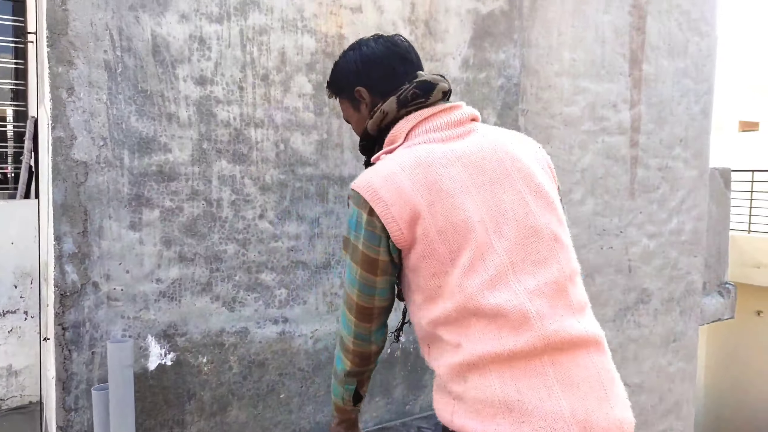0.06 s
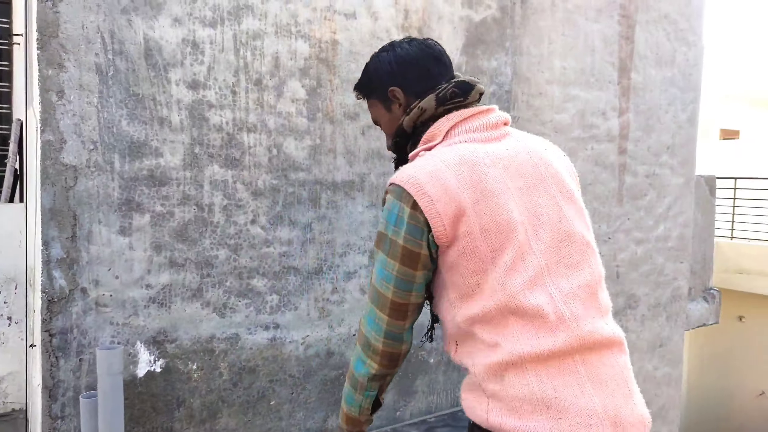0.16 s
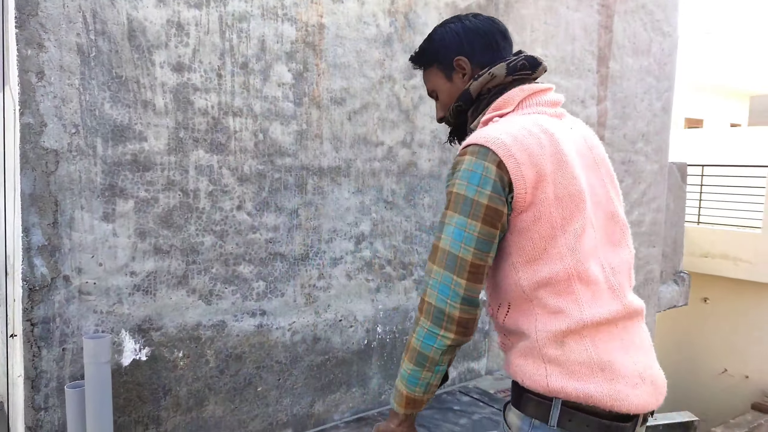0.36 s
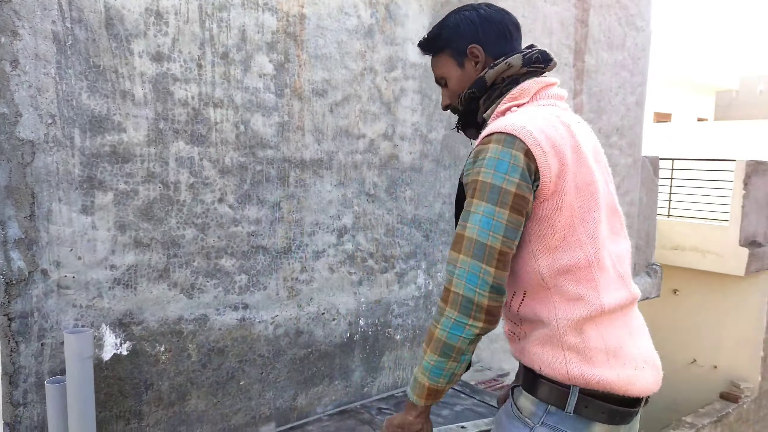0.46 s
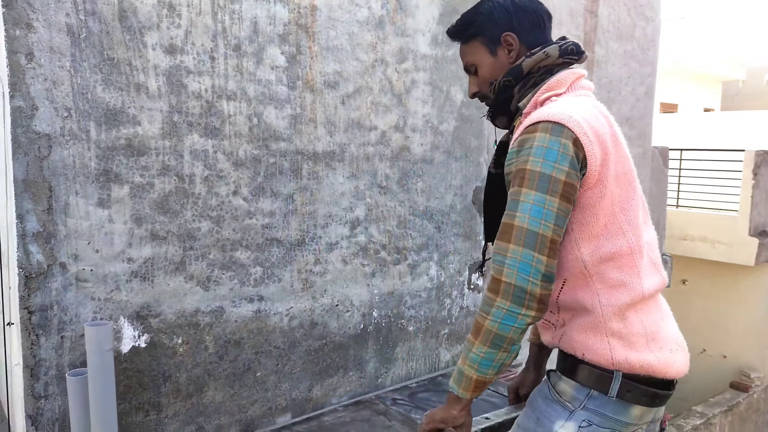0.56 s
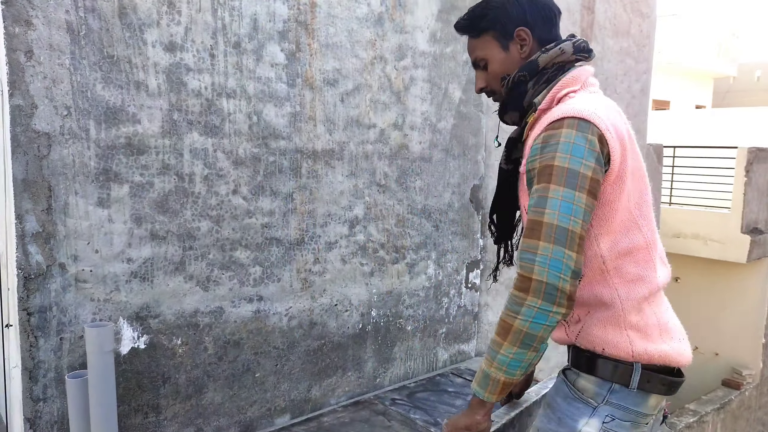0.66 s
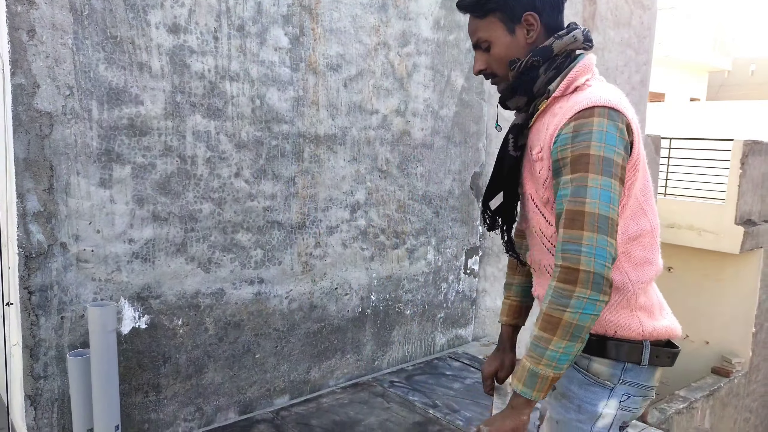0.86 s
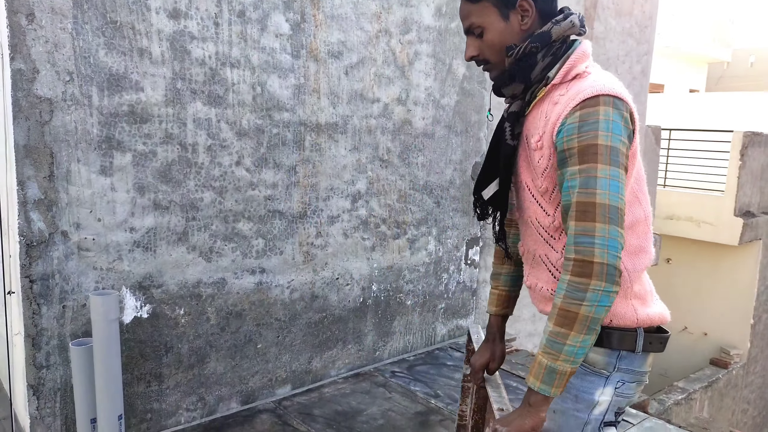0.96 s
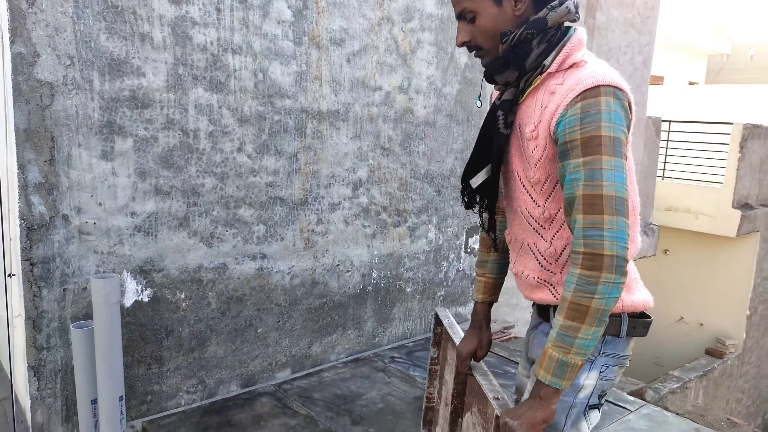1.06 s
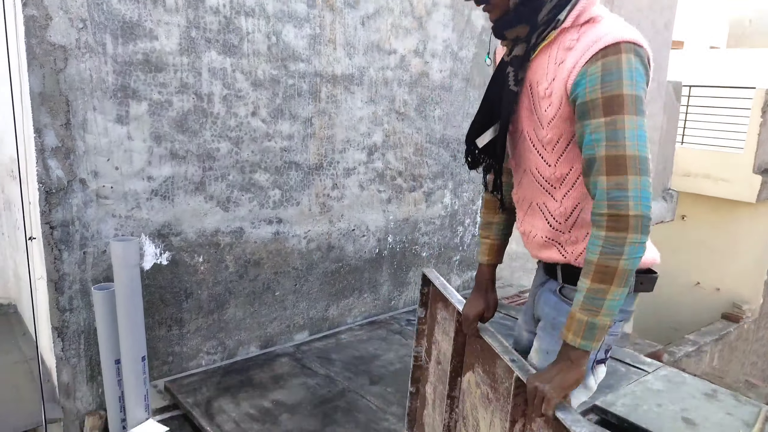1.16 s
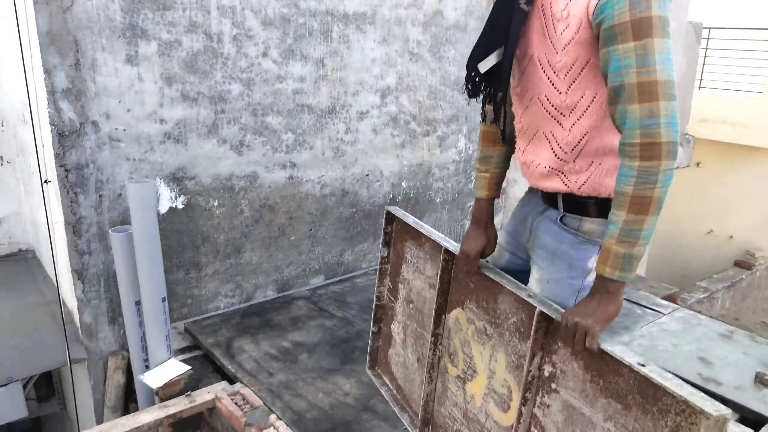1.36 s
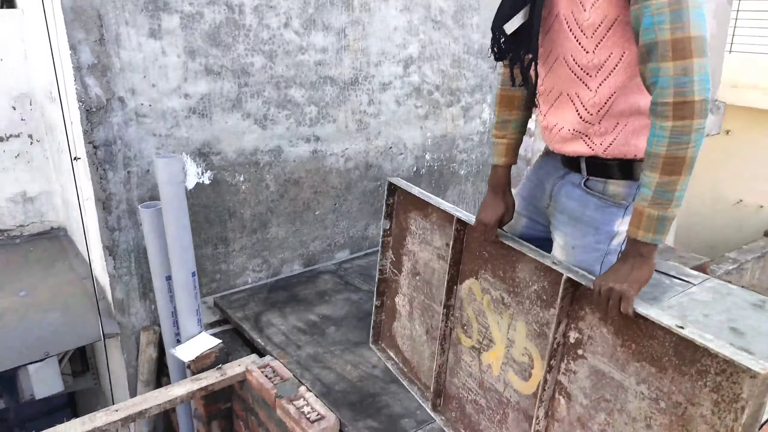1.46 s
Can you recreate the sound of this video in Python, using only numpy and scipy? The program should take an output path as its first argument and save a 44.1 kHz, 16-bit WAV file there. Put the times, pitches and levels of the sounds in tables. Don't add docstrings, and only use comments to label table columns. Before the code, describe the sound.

A framed steel plate is handled on bricks outdoors. Soft grit scrapes begin, brighter near 0.2 s, with small knocks and a sharp crack at 0.23. The loudest clanks cluster at 0.32-0.47 with hollow thuds and crackle; a thin squeal follows to 0.8. Knocks at 0.55-0.7 weaken. After a lull, faint scrapes lead to a softer knock at 1.2 and fading rattle. Wind and faint distant site noise continue.

```python
import sys
import numpy as np
from scipy import signal
from scipy.fft import rfft, irfft
from scipy.io import wavfile
from scipy.ndimage import uniform_filter1d

SR = 44100
rng = np.random.default_rng(int(sys.argv[2]) if len(sys.argv) > 2 else 0)


def to_wav(sig):
    pcm = np.clip(np.atleast_2d(sig), -1, 1) * 32767
    pcm = np.round(pcm).astype(np.int16)
    wavfile.write(sys.argv[1], SR, pcm.T)


def voltage_ratio(level):
    return 10 ** (np.asarray(level, float) / 20)


N = 66150
SPAN = 2 ** 14

# frequency in Hz, level in dB.
SITE_SPECTRUM = [(30, -7.5), (100, 0.5), (200, -9.5), (700, -13.5), (1500, -25.5), (3000, -37.5),
                 (6000, -43), (15500, -50.5)]
# time in seconds, level in dB.
GUSTS = [(0.0, -61.5), (0.028, -47.5), (0.174, -61), (0.358, -45.5), (0.38, -57), (0.54, -60), (0.622, -52),
         (0.665, -64), (0.725, -66), (0.78, -47), (0.85, -62), (0.93, -66.5), (1.22, -68.5), (1.26, -64),
         (1.3, -48.5), (1.332, -46), (1.44, -62), (1.49, -56)]
# start in seconds, frequency in Hz, level in dB,
# time to fall by 60 dB in seconds.
GROUND_THUDS = [(.332, 68, -34, .3), (.402, 110, -35, .2), (.56, 82, -48, .3), (.61, 75, -44, .2),
                (.743, 80, -38, .15), (.76, 45, -40, .25), (.745, 120, -43, .6), (.755, 155, -48, .4),
                (1.245, 190, -50, .15), (.62, 145, -48, .15), (.335, 135, -42, .2), (.42, 180, -44, .15),
                (1.305, 100, -49, .2)]
# time in seconds, pitch in Hz, level in dB.
SQUEAL_PATH = [
    (.42, 3280, -80),
    (.44, 3290, -64),
    (.505, 3330, -66),
    (.525, 3410, -62),
    (.62, 3450, -63),
    (.75, 3470, -68),
    (.81, 3480, -78),
    (.88, 3480, -95),
]
# time in seconds, level in dB.
CRACKLE_LEVEL = [
    (.02, -99),
    (.08, -85),
    (.16, -81.5),
    (.3, -77),
    (.38, -73),
    (.5, -78.5),
    (.53, -72),
    (.6, -90),
    (.66, -103.5),
]
# centre in Hz, width in Hz, level in dB.
SNAP_BANDS = [(5040, 1000, -0.5), (6550, 460, -2.5)]
# start in seconds, length in seconds, level in dB,
# tilt in dB per octave, singing frequency in Hz.
STROKES = [(0, 0.11, -60, -8.5, 970), (.035, 0.1, -60, -3, 1610), (0.108, 0.15, -59, -4.5, 1640),
           (0.178, 0.093, -44, -0.5, 2550), (0.251, .08, -76.5, 12.5, 6500),
           (0.959, 0.047, -73.5, 0.5, 3460), (.965, 0.037, -75.5, 0, 2360), (1.051, .14, -65, -0.5, 3700),
           (1.081, .09, -71.5, 7, 8500), (1.19, .085, -58, -7, 3500), (.31, .13, -50, -11, 2800),
           (.23, .07, -58, 0, 2400), (1.313, .12, -60.5, -12.5, 1270)]
# frequency in Hz, level in dB.
GRIT_SPECTRUM = [(500, 4), (1250, 4.5), (2600, -1.5), (4000, -9), (5500, -13.5), (7300, -22.5), (8500, -28),
                 (14000, -51.5)]
# start in seconds, peak level in dB, frequency in Hz.
DRY_TICKS = [(.2304, -22, 1450), (.2328, -27, 1050), (.110, -45, 1700), (.3025, -41, 1400),
             (1.4762, -54, 1800), (.072, -46, 1600), (.181, -48, 1600), (.313, -42, 1400),
             (.684, -70, 6500), (1.294, -60, 2300), (.2306, -48, 4200), (.551, -31, 900),
             (.5525, -42, 1400), (.3234, -30, 1500), (.1885, -33, 1500), (.2115, -33, 1500),
             (.284, -62, 5500), (.304, -62, 6000), (.522, -60, 6000), (.93, -72, 6000), (.478, -38, 1100)]
# start in seconds, driven time in seconds,
# frequency in Hz, level in dB, time to fall by 60 dB in seconds.
HELD_MODES = [(.1885, .013, 660, -36.5, .05), (.188, .006, 1600, -46, .04), (.237, .05, 955, -53, .15),
              (.33, .032, 250, -31, .1), (.333, .03, 505, -32, 0.089), (.338, .03, 558, -32, .2),
              (.34, .018, 877, -33, .1), (.355, .025, 708, -33, 0.13), (.326, .03, 1040, -40.5, 0.18),
              (.326, .025, 1200, -38.5, .1), (.335, .04, 1468, -40.5, 0.37), (.335, .03, 1666, -40, .3),
              (.33, .025, 1906, -40, 0.12), (.33, 0.025, 2400, -50, .3), (.345, 0.034, 1349, -43.5, 0.33),
              (.36, 0.026, 338, -38.5, 0.13), (.415, .042, 704, -34, .08), (.39, .025, 445, -35, .1),
              (.42, 0.046, 1210, -43, 0.25), (.41, .05, 1272, -44.5, 0.39), (.43, .03, 256, -41, .08),
              (.44, 0.016, 484, -40, 0.092), (.551, .05, 350, -39.5, 0.064), (.56, 0.018, 460, -40, .15),
              (.553, 0.042, 1175, -43, 0.22), (.57, .02, 780, -39, .1), (.551, 0.016, 2080, -52, .13),
              (.615, 0.036, 722, -43, .06), (.655, 0.034, 720, -44, 0.07), (.63, .06, 1255, -50.5, 0.2),
              (.73, .07, 1280, -66, 0.16), (.615, .085, 475.5, -49, .1), (1.088, 0.023, 1230, -62, 0.068),
              (1.117, 0.031, 1326, -62, 0.053), (1.12, .025, 2200, -73.5, .15),
              (1.205, .03, 355, -38.5, .08), (1.205, .016, 405, -38.5, .12), (1.208, .025, 624, -45, 0.18),
              (1.202, 0.024, 1230, -50, 0.16), (1.28, .03, 437.4, -56, .12)]
# start in seconds, length in seconds, level in dB,
# tilt in dB per octave, favoured mode in Hz.
PLATE_KNOCKS = [(0.1868, 0.014, -39, 8.5, 660), (0.207, 0.016, -41.5, 2, 1580),
                (.238, 0.084, -52, 5.5, 955), (.3232, .016, -28, 1, 1600), (0.338, 0.0073, -28, 2, 520),
                (0.35, 0.011, -27, 4, 846), (0.363, .035, -33, 1, 399.5), (0.401, 0.059, -34.5, 0, 1330),
                (0.471, 0.076, -41, 5, 1500), (0.5505, .02, -36.5, 0.5, 1098),
                (.573, 0.021, -37.5, 0.5, 800), (.605, 0.03, -41.5, -0.5, 567), (.645, 0.03, -46, 0, 696),
                (.70, 0.029, -54.5, -1.5, 506), (.72, 0.17, -60, -4, 500), (1.1997, .008, -49, 1, 1250),
                (1.208, .016, -41, 3, 800), (1.235, .025, -51, -1, 450), (1.281, 0.16, -63, -9, 394)]
# frequency in Hz, level in dB, time to fall by 60 dB in seconds.
STRONG_MODES = [(250, 4.5, 0.14), (345.6, 14, 0.11), (439.7, 15.5, 0.091), (486.7, 4.5, 0.41),
                (520, 10.5, 0.089), (570, 3, 0.071), (660, 4, 0.2), (704.7, 5.5, 0.22), (873, -8, 0.22),
                (955, -3, 0.21), (1215.5, 0, 0.37), (1278, -0.5, 0.47), (1380, -4, .3), (1730, -2, .1)]
# frequency in Hz, level in dB.
WEAK_MODES = [(90, -10.5), (180, -10.5), (300, -6), (800, -1), (1800, -5), (2600, -18), (4000, -28.5),
              (7000, -31)]

EVEN_SHARE = 0.7


def rms_one(x):
    return x / np.sqrt(np.mean(np.abs(x) ** 2) + 1e-20)


def at_hz(points, hz):
    point_hz, db = np.transpose(points)
    return np.interp(np.log(hz), np.log(point_hz), db)


def filtered(sound, order, hz, kind="low"):
    return signal.sosfilt(signal.butter(order, hz, kind, fs=SR, output="sos"), sound)


def grains(per_s, spread_db):
    sizes = voltage_ratio(spread_db * np.minimum(rng.exponential(1, SPAN), 4))
    signs = rng.choice([-1, 1], SPAN)
    return rms_one(sizes * signs * (rng.random(SPAN) < per_s / SR))


def add(out, s, sound):
    i = int(s * SR)
    out[i:i + len(sound)] += sound[:len(out) - i]


def evened(sound, until_s, over_s):
    level = np.sqrt(uniform_filter1d(sound ** 2, int(over_s * SR)) + 1e-20)
    level = level[np.minimum(np.arange(len(sound)), int(until_s * SR))]
    return sound / np.maximum(level / level[-1], 0.25) ** EVEN_SHARE


def site():
    hz = np.arange(1, N // 2 + 2) * SR / N
    spectrum = rfft(rng.standard_normal(N)) * voltage_ratio(at_hz(SITE_SPECTRUM, hz)) * (hz > 25)
    return voltage_ratio(-66) * rms_one(irfft(spectrum, N))


def wind():
    s, db = np.transpose(GUSTS)
    low = filtered(rng.standard_normal(N + SR), 1, [22, 68.4], "band")
    low = filtered(low, 4, 135.0)[SR:]
    lumps = np.sqrt(uniform_filter1d(low ** 2, int(0.03 * SR)))
    return voltage_ratio(np.interp(np.arange(N) / SR, s, db)) * rms_one(low / lumps ** EVEN_SHARE)


def thud():
    out, t = np.zeros(N), np.arange(SPAN) / SR
    soft_start = 1 - np.exp(-t / 0.0027)
    for s, hz, db, t60 in GROUND_THUDS:
        add(out, s, voltage_ratio(db - 60 * t / t60) * np.sin(2 * np.pi * hz * t) * soft_start)
    return out


def squeal():
    s, hz, db = np.transpose(SQUEAL_PATH)
    t = np.arange(N) / SR
    slip = filtered(rng.standard_normal((2, N)), 4, 130)
    rough = np.clip((t - 0.49) / 0.03, 0.35, 0.9)
    smear = np.sqrt(1 - rough ** 2) + rough * rms_one(slip[0] + 1j * slip[1])
    tone = smear * np.exp(2j * np.pi * np.cumsum(np.interp(t, s, hz)) / SR)
    return np.sqrt(2) * voltage_ratio(np.interp(t, s, db, left=-150, right=-150)) * tone.real


def crackle():
    s, db = np.transpose(CRACKLE_LEVEL)
    snaps = np.concatenate([grains(per_s=500, spread_db=2.5) for _ in range(N // SPAN + 1)])[:N]
    snaps = snaps + 0.5 * rng.standard_normal(N)
    bands = np.zeros(N)
    for hz, width, band_db in SNAP_BANDS:
        bands += voltage_ratio(band_db) * filtered(snaps, 2, [hz - width / 2, hz + width / 2], "band")
    return voltage_ratio(np.interp(np.arange(N) / SR, s, db, left=-150, right=-150)) * rms_one(bands)


def scrapes():
    sing_db, sing_octaves = 8, 0.17
    out, t = np.zeros(N), np.arange(SPAN) / SR
    hz = np.arange(1, SPAN // 2 + 2) * SR / SPAN
    for s, length, level_db, tilt_db, sing_hz in STROKES:
        singing = sing_db * np.exp(-(np.log2(hz / sing_hz) / sing_octaves) ** 2)
        colour = voltage_ratio(at_hz(GRIT_SPECTRUM, hz) + tilt_db * np.log2(hz / 2000) + singing)
        colour = colour * hz ** 2 / (hz ** 2 + 1180.0 ** 2)
        sound = rms_one(irfft(rfft(grains(per_s=2200, spread_db=3.0)) * colour, SPAN))
        stroke = np.sin(np.pi * np.minimum(t / length, 1)) ** 2
        add(out, s, voltage_ratio(level_db) * sound * stroke)
    return out


def ticks():
    fall_cycles = 4.5
    out, t = np.zeros(N), np.arange(2000) / SR
    for s, db, hz in DRY_TICKS:
        rise = np.minimum(1.5 * t * hz, 1) ** 2
        for ratio in (0.72, 1, 1.35, 1.8):
            level = voltage_ratio(db - 3 - 12 * abs(np.log2(ratio)) - 20 * t * hz / fall_cycles)
            add(out, s, level * rise * np.cos(2 * np.pi * hz * ratio * (t - 0.75 / hz)))
    return out


def rings():
    onset_s, roughness, wobble_hz = 0.003, 0.45, 50.0
    out, i = np.zeros(N), np.arange(SPAN)
    t = i / SR
    for s, length, hz, db, t60 in HELD_MODES:
        a, b = filtered(rng.standard_normal((2, 2 * SPAN)), 2, wobble_hz)[:, SPAN:]
        wobble = rms_one(a + 1j * b)
        feed = 1 + roughness * wobble[np.minimum(i, int(length * SR) + i // 4)]
        shape = (1 - np.exp(-t / onset_s)) * voltage_ratio(db + 3 - 60 * np.maximum(t - length, 0) / t60)
        tone = np.exp(2j * np.pi * (hz * t + rng.random()))
        add(out, s, shape * (feed * tone).real)
    return out


def plate_modes():
    weak_hz = np.geomspace(90, 7000, 260) * voltage_ratio(0.094 * rng.standard_normal(260))
    hz, db, t60 = np.transpose(STRONG_MODES)
    hz, db = np.r_[hz, weak_hz], np.r_[db, at_hz(WEAK_MODES, weak_hz)]
    t60 = np.r_[t60, 0.17 * (weak_hz / 1000) ** -0.2][:, None]
    z = np.exp(-2j * np.pi * np.arange(SPAN // 2 + 1) / SPAN)
    r = voltage_ratio(-60 / (t60 * SR))
    w = 2 * np.pi * hz[:, None] / SR
    response = np.sin(w) * z / (1 - 2 * r * np.cos(w) * z + r * r * z * z)
    return hz, db, response.astype(np.complex64)


def impact_force(length):
    first_blow, onset_s, fall_s = 2.6, 0.0013, 0.0013
    t = np.arange(SPAN) / SR
    force = grains(per_s=1500, spread_db=3)
    force[0] = 1
    force = force * (1 + first_blow * np.exp(-t / onset_s))
    force = force * np.exp(-np.maximum(t - length, 0) / fall_s)
    return filtered(force, 4, [170.0, 3090], "band")


def plate():
    favour_db, favour_octaves, spread_db = 8, 0.12, 1.5
    grip_t60_s = 0.53
    hz, db, modes = plate_modes()
    out, t = np.zeros(N), np.arange(SPAN) / SR
    for s, length, level_db, tilt_db, favoured_hz in PLATE_KNOCKS:
        favour = favour_db * np.exp(-(np.log2(hz / favoured_hz) / favour_octaves) ** 2)
        spread = spread_db * rng.standard_normal(len(hz))
        gains = voltage_ratio(db + tilt_db * np.log2(hz / 700) + favour + spread)
        gains = gains * rng.choice([-1, 1], len(hz))
        response = gains.astype(np.complex64) @ modes
        sound = irfft(rfft(impact_force(length)) * response, SPAN)
        sound = sound * voltage_ratio(-60 * np.maximum(t - length, 0) / grip_t60_s)
        sound = evened(sound, length, over_s=0.005)
        contact = sound[:int((length + 0.01) * SR)]
        add(out, s, voltage_ratio(level_db) * sound / np.sqrt(np.mean(contact ** 2)))
    return out


def scene():
    background = site() + wind()
    grit = squeal() + crackle() + scrapes()
    steel = ticks() + rings() + plate()
    return (background + thud() + grit + steel)[None]


def top_cut(x):
    return signal.sosfilt(signal.butter(12, 15500, fs=SR, output="sos"), x)


def record(dry):
    return top_cut(dry)


dry = scene()
out = record(dry)
to_wav(out)
```